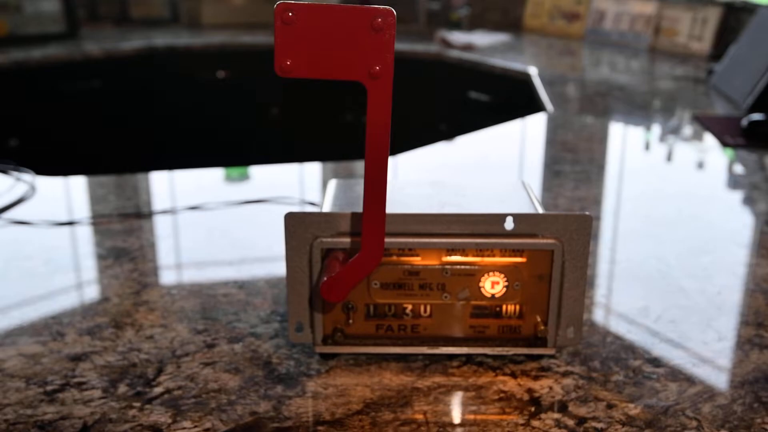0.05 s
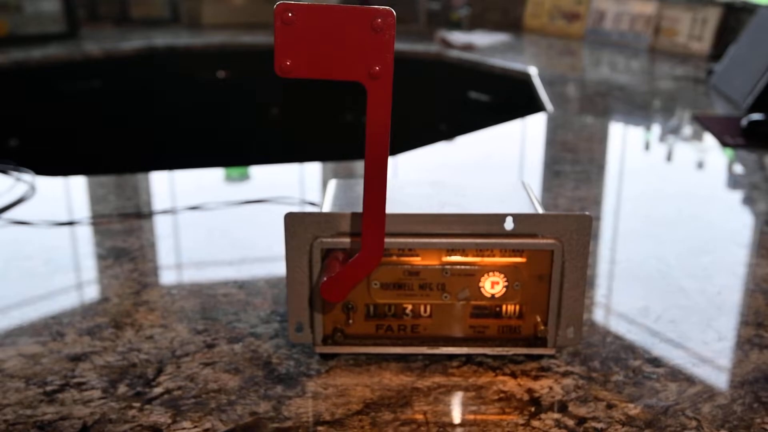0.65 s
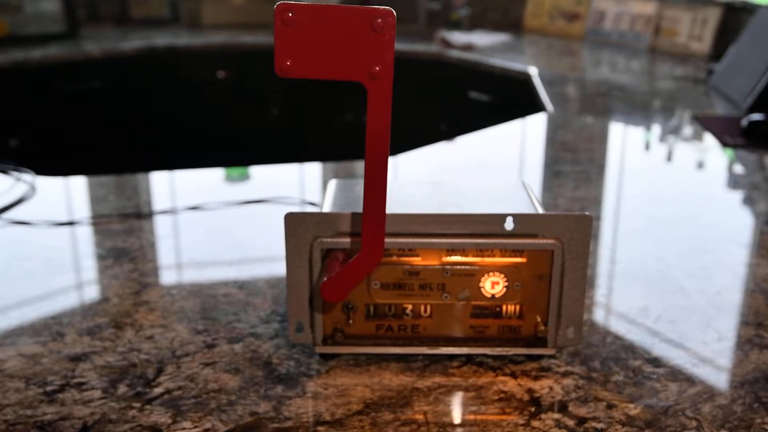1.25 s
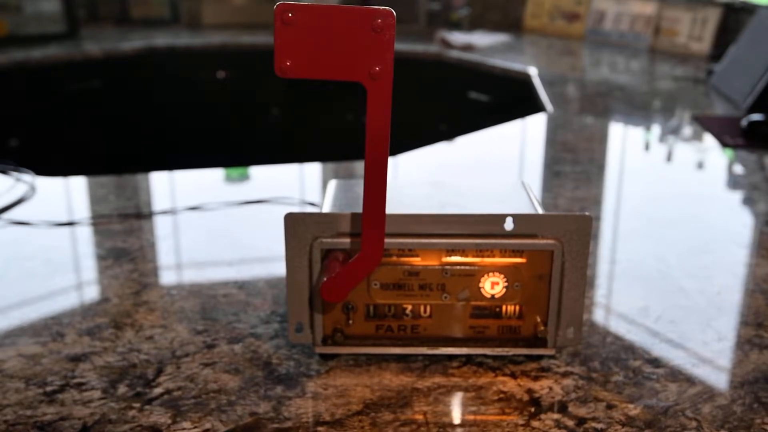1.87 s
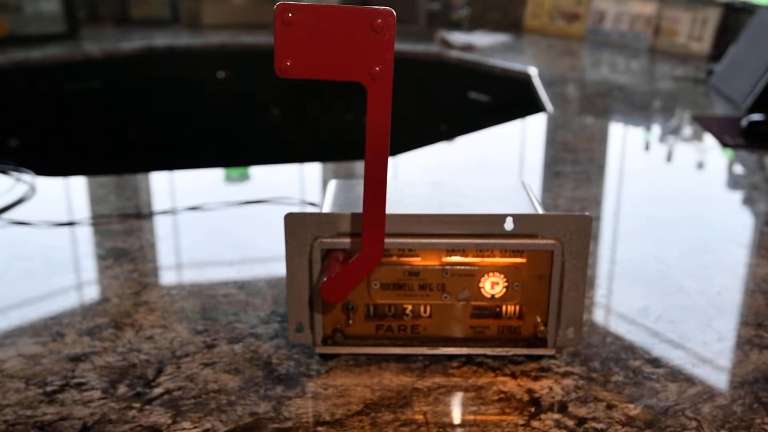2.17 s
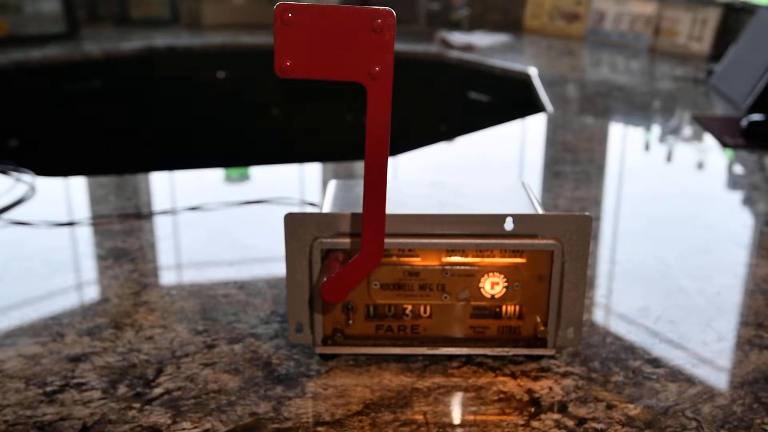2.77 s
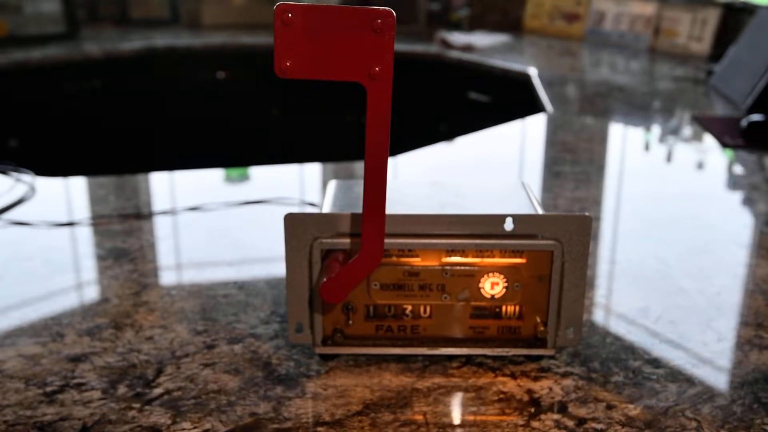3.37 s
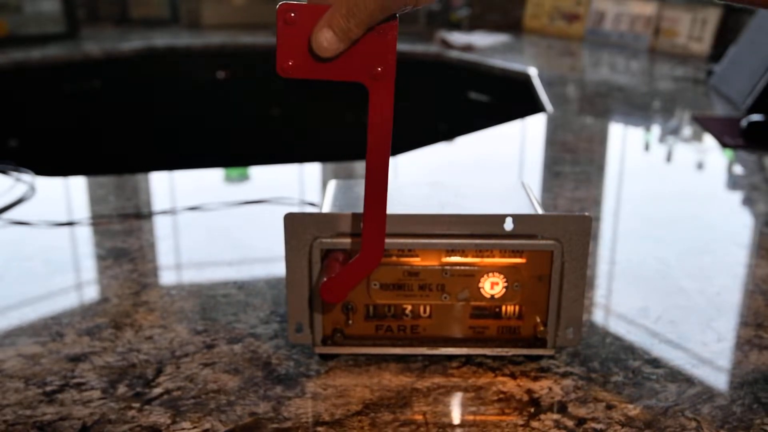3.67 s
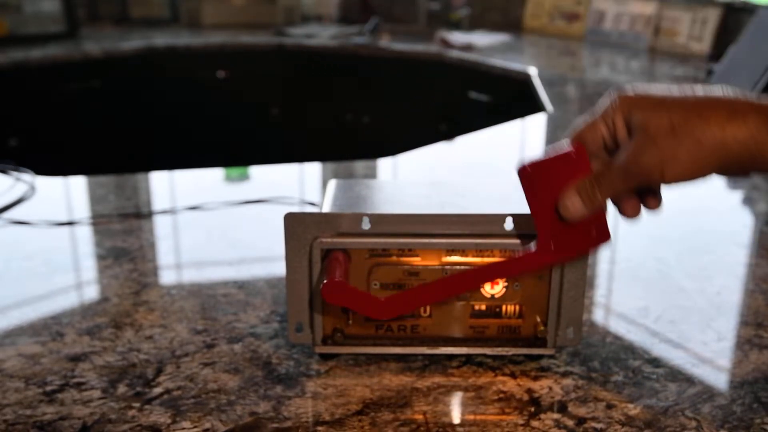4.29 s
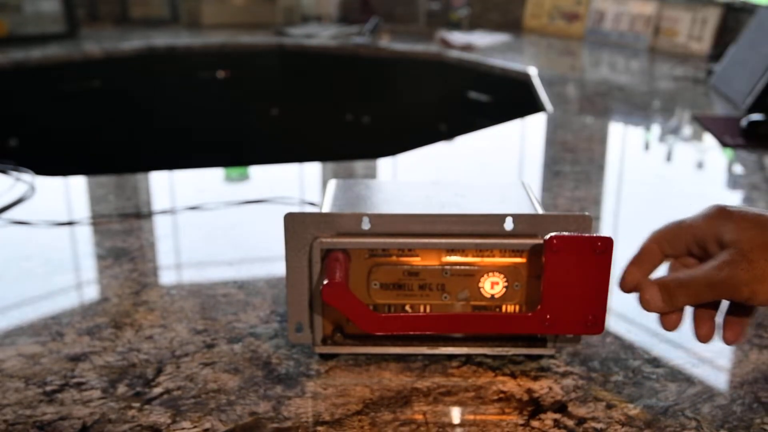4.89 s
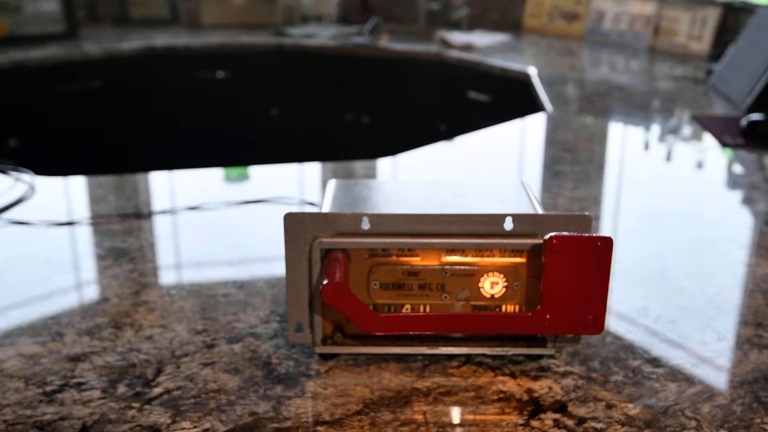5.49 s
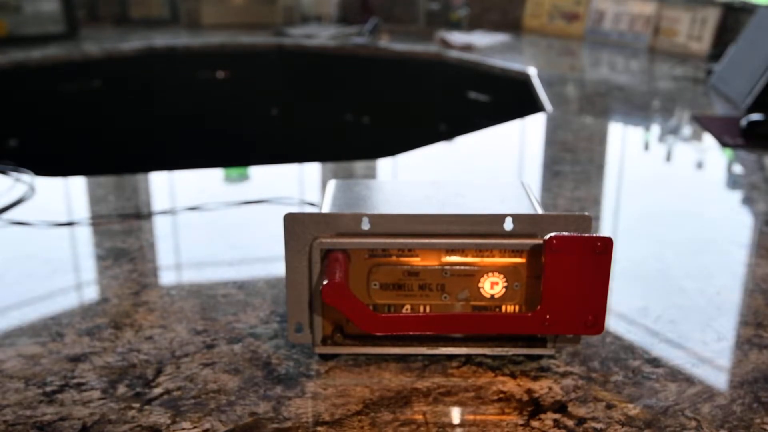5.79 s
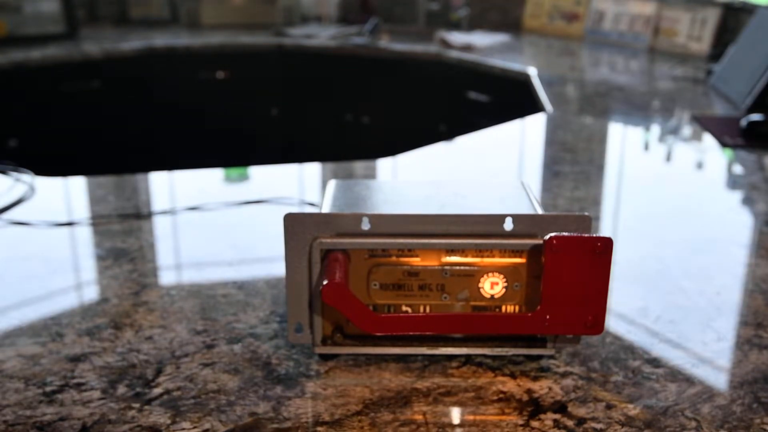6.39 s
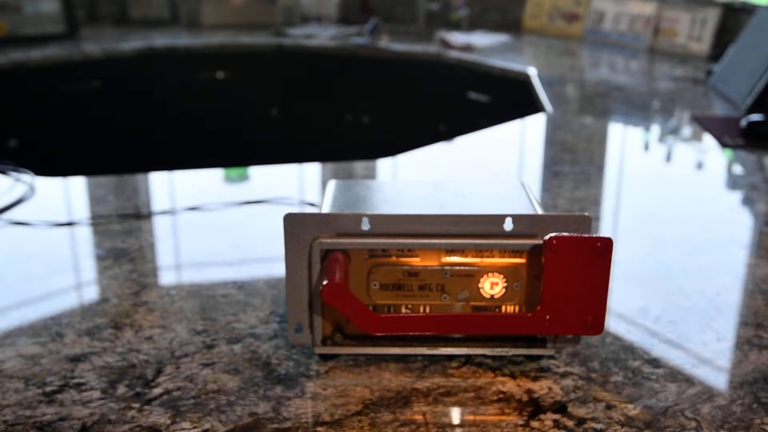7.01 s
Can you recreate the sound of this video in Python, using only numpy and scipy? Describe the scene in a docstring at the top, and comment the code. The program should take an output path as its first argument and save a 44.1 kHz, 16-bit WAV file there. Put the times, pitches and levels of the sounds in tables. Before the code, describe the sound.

Close up in a quiet kitchen, the gears of a mechanical fare meter run with a steady whirr. After faint clothing rustle and soft thumps, its lever is pulled down, clicking unevenly and rocking the metal case. Three loud, snapping clunks follow, a little under a second apart, as the number drums advance. Each leaves a brief metallic ring, while the gears keep turning softly over a faint hum.

```python
"""Mechanical taxi meter in a kitchen.

The gear train whirrs on a stone counter. Someone steps up, clothes rustling, and turns the flag lever
down through its detents, loading the gears. The fare drums advance three times: a pawl drops, a catch
lets go, a spring slams the drum home and rings the steel case. The gears run on, quieter."""
import sys
import numpy as np
from scipy import signal
from scipy.fft import rfft, irfft, next_fast_len
from scipy.io import wavfile

SR = 44100
rng = np.random.default_rng(int(sys.argv[2]) if len(sys.argv) > 2 else 0)


def transcribe(signal):
    """Save signal, clipped to [-1, 1], as a 16-bit WAV file at the path in sys.argv[1]."""
    frames = np.atleast_2d(signal).T
    limited = np.clip(frames, -1, 1)
    pcm = np.round(limited * 32767).astype(np.int16)
    wavfile.write(sys.argv[1], SR, pcm)


N = 310905
TIME = np.arange(N) / SR


def from_db(db):
    """Decibels to gain."""
    return 10 ** (np.asarray(db) / 20)


def unit_rms(x):
    """Scale to rms 1."""
    return x / np.sqrt(np.mean(x ** 2) + 1e-20)


def at_hz(table, hz):
    """Read a table on a log-frequency axis."""
    table_hz, values = np.transpose(table)
    return np.interp(np.log(np.maximum(hz, 1)), np.log(table_hz), values)


def drift(rate_hz):
    """Linear glide between unit-normal random values."""
    knots = rng.standard_normal(400)
    return np.interp(TIME * rate_hz, np.arange(len(knots)), knots)


def highpass(x, hz, order=2):
    """Butterworth high-pass."""
    return signal.sosfilt(signal.butter(order, hz, "high", fs=SR, output="sos"), x + 1e-18)


def add(out, time_s, sound):
    """Mix a sound in at time_s."""
    start = round(time_s * SR)
    out[..., start:start + sound.shape[-1]] += sound[..., :N - start]


# Left-right correlation: (frequency [Hz], correlation [0..1])
CORRELATION = [(300, 1), (500, 1), (1000, 0.92), (2000, 0.78), (4000, 0.096), (15000, 0.073)]

def spread(pair, hz):
    """Two independent signals to stereo, alike in the bass."""
    alike = at_hz(CORRELATION, hz)
    return np.sqrt(1 + alike) * pair[0] + np.sqrt(1 - alike) * pair[1] * np.array([[1], [-1]])


def coloured(pair, spectrum):
    """Shape a noise pair to a spectrum; stereo, rms 1."""
    size = next_fast_len(N)
    hz = np.fft.rfftfreq(size, 1 / SR)
    bins = spread(rfft(pair, size), hz) * from_db(at_hz(spectrum, hz))
    return unit_rms(irfft(bins, size)[:, :N])


# Room hum and electronic whine: (frequency [Hz], rms level [dB])
HUM_TONES = [(42.0, -60.5), (48.4, -54), (7795, -74.5), (15590, -68)]
# Room air: (frequency [Hz], density [dB])
AIR_SPECTRUM = [(25, -20), (45, -8), (75, -4.5), (130, -5), (300, -23.5), (1000, -13), (4000, -24.5),
                (10000, -31.5), (16000, -34)]

def room_tone(air_db):
    """Wavering hum and whine over steady air noise."""
    hum = sum(from_db(db + 1.6 * drift(3.6)) * np.sin(2 * np.pi * (hz * TIME + rng.random()))
              for hz, db in HUM_TONES)
    return np.sqrt(2) * hum + from_db(air_db) * coloured(rng.standard_normal((2, N)), AIR_SPECTRUM)


# Gear noise, free-running and loaded: (frequency [Hz], density [dB])
FREE_SPECTRUM = [(100, -11), (180, -1.5), (320, -3.5), (420, -5.5), (680, -10.5), (880, -8), (1150, -5),
                 (1400, -16), (1680, -16), (1900, -3.5), (2200, -14), (2900, -17.5), (3700, -33.5),
                 (7000, -33)]
LOADED_SPECTRUM = [(100, 4), (170, 3.5), (280, 5.5), (420, -3.5), (750, -8.5), (1080, -2.5), (1350, -31),
                   (1650, -7), (1850, 2), (2150, -41), (2800, -15), (3270, -3), (3800, -57), (7000, -29)]
# Shaft harmonics sung by the case: (multiple of turn rate, level [dB])
SHAFT_HARMONICS = [(8, -15), (9, -22.5), (12, -19), (15, -8.5), (18, -15), (21, -8.5), (23, -14.5),
                   (39, -17), (50, -17), (54, -19), (57, -17), (63, -16), (70, -15), (118, -15.5),
                   (125, -31)]

def gear_train(turn_hz, wobble, repeat_share, wear_db, lobe_db, shaft_db):
    """Rough teeth recur every turn, pressed harder three times a turn; the lever adds load."""
    turns = np.cumsum(turn_hz * (1 + wobble * drift(3))) / SR
    size = round(SR / turn_hz)
    one_turn = unit_rms(irfft(np.exp(2j * np.pi * rng.random((2, size // 2 + 1))), size))
    teeth = one_turn[:, (turns * size).astype(int) % size]
    wear = unit_rms(sum(np.cos(2 * np.pi * (k * turns + rng.random())) for k in range(4, 11)))
    lobes = np.cos(2 * np.pi * 3 * turns)
    rub = np.sqrt(repeat_share) * teeth + np.sqrt(1 - repeat_share) * rng.standard_normal((2, N))
    rub *= from_db(lobe_db * lobes + wear_db * wear)
    shaft = sum(from_db(db + 2 * drift(10)) * np.sin(2 * np.pi * (k * turns + rng.random()))
                for k, db in SHAFT_HARMONICS)
    free = coloured(rub, FREE_SPECTRUM) + from_db(shaft_db) * shaft
    engage_s = (4.35, 4.65)
    free_db = np.interp(TIME, engage_s, (-46, -59))
    loaded_db = np.interp(TIME, engage_s, (-63, -48.5))
    return from_db(free_db) * free + from_db(loaded_db) * coloured(rub, LOADED_SPECTRUM)


def force_db(blow, hz):
    """Spectrum of a blow: hard contacts crack, heavy ones thud."""
    _, crack, thud, clank, sizzle = blow
    return at_hz([(380, thud), (1000, clank), (3000, crack), (7000, crack), (12000, sizzle)], hz)


# Dense case modes: (frequency [Hz], density [dB])
CLATTER_SPECTRUM = [(60, 4), (165, -6), (240, 11), (430, 2.5), (720, -4), (1080, 0.5), (1450, -13),
                    (1900, -4.5), (2450, -15), (3200, -12), (7000, -20), (11500, -13.5), (15000, -7.5),
                    (16500, -13)]
# Decay of case and kitchen: (frequency [Hz], t60 [s])
ROOM_DECAY = [(100, 0.92), (300, 0.49), (1000, 0.67), (3500, 0.6), (7000, 0.56), (15000, 0.3)]

def clatter(blows, level_db, crack_t60_s, rattle_db, rattle_t60_s, room_db):
    """Crowded modes as noise bands: a crack, a rattle of loose parts, the kitchen's tail."""
    out, t = np.zeros((2, N)), TIME[:SR // 2]
    edges_hz = np.geomspace(60, 17000, 29)
    white = rng.standard_normal((2, 2, SR + SR // 2))
    offsets = rng.integers(SR // 8, SR, len(blows))
    crack = from_db(-60 * t / crack_t60_s)
    rattle = from_db(rattle_db - 60 * t / rattle_t60_s)
    for k, (low, high) in enumerate(zip(edges_hz, edges_hz[1:])):
        hz = np.sqrt(low * high)
        bandpass = signal.butter(2, [low, high], "band", fs=SR, output="sos")
        band = spread(signal.sosfilt(bandpass, white[k % 2]), hz)
        tail = from_db(room_db - 60 * t / at_hz(ROOM_DECAY, hz))
        swell = 1 - np.exp(-t * hz / 1.5)   # builds over 1.5 cycles
        envelope = swell * np.sqrt(crack ** 2 + rattle ** 2 + tail ** 2)
        for blow, i in zip(blows, offsets):
            gain = from_db(force_db(blow, hz) + at_hz(CLATTER_SPECTRUM, hz))
            add(out, blow[0], gain * envelope * band[:, i:i + len(t)])
    return from_db(level_db) * out


# Faint clicks: (time [s], crack [dB], thud [dB], clank [dB], sizzle [dB])
FAINT_CLICKS = [(0.260, -40.5, -70, -49, -51), (2.130, -60, -41, -42, -64), (4.363, -42, -36, -42, -52),
                (5.721, -48, -48, -51, -54)]

def faint_clicks(slips):
    """A faint, sharp click as the sound fades in; later, soft ticks and the slips of the catch."""
    return clatter(FAINT_CLICKS + slips, level_db=21.5, crack_t60_s=0.033,
                   rattle_db=-25, rattle_t60_s=0.07, room_db=-18)


# Body movements: (peak time [s], length [s], level [dB])
MOVEMENTS = [(1.475, 0.15, -43.5), (2.09, .05, -54), (2.338, 0.024, -49), (2.83, 0.61, -45.5),
             (3.24, 0.2, -45)]
# Cloth friction: (frequency [Hz], density [dB])
CLOTH_SPECTRUM = [(500, -3), (2000, 0.5), (5000, -1.5), (10000, -1.5), (16000, -1)]

def clothes(grain_db, rise_db_per_s, sag_db_per_s, fall_db_per_s):
    """Sliding fibres hiss; each movement starts fast, slows and stops."""
    level_db = -np.inf
    for peak_s, length_s, db in MOVEMENTS:
        rise_db = rise_db_per_s * np.maximum(peak_s - TIME, 0)
        sag_db = sag_db_per_s * np.clip(TIME - peak_s, 0, length_s)
        fall_db = fall_db_per_s * np.maximum(TIME - peak_s - length_s, 0)
        level_db = np.maximum(level_db, db - rise_db - sag_db - fall_db)
    envelope = from_db(level_db + grain_db * drift(50))
    return envelope * coloured(rng.standard_normal((2, N)), CLOTH_SPECTRUM)


# Steps, then the meter rocking under the lever: (time [s], level [dB], frequency [Hz], t60 [s])
DULL_KNOCKS = [(2.325, -29, 75.6, 0.15), (2.392, -36, 102, 0.29), (4.187, -32.5, 294, 0.21),
               (4.238, -30, 241, 0.15), (4.376, -18, 327, 0.15), (4.397, -12, 303, 0.057),
               (4.434, -25, 331, .1), (4.656, -33, 258, 0.18)]
# Hollow bump against the counter: (frequency [Hz], level [dB], t60 [s])
BUMP_MODES = [(124, -24.5, 0.11), (195, -28.5, 0.08), (402.7, -28.5, .2), (429, -20.5, 0.093)]

def knocks(level_db, swell_cycles, bump_s):
    """Soft contacts ring low modes; a case panel answers each knock."""
    out, t = np.zeros(N), TIME[:SR // 2]

    def mode(hz, db, t60_s):
        """One softly struck mode."""
        swell = 1 - np.exp(-(t * hz / swell_cycles) ** 2)
        return from_db(level_db + db - 60 * t / t60_s) * swell * np.sin(2 * np.pi * hz * t)

    for time_s, db, hz, t60_s in DULL_KNOCKS:
        panel = mode(hz=1050, db=db - 14.5, t60_s=0.062)
        add(out, time_s, mode(hz, db, t60_s) + panel)
    add(out, bump_s, sum(mode(*row) for row in BUMP_MODES))
    return out


def struck(blows, modes, level_db, scatter_db):
    """Each blow rings all modes at scattered levels; high modes differ in phase left to right."""
    out, t = np.zeros((2, N)), TIME[:SR // 2]
    for hz, mode_db, t60_s in modes:
        phase = np.arccos(at_hz(CORRELATION, hz)) / 2 * rng.choice([-1, 1]) * np.array([[1], [-1]])
        envelope = from_db(level_db + mode_db - 60 * t / t60_s)
        tone = rng.choice([-1, 1]) * envelope * np.sin(2 * np.pi * hz * t + phase)
        for blow in blows:
            add(out, blow[0], tone * from_db(force_db(blow, hz) + scatter_db * rng.standard_normal()))
    return out


# Steel case: (frequency [Hz], level [dB], t60 [s])
CASE_MODES = [(55.7, -33, 1.0), (127.2, -7, 0.46), (224.2, -0.5, 0.35), (268.2, 4.5, 0.42),
              (333.6, -7, 0.66), (369.6, 3, 0.4), (474, 3, 0.053), (594, -6.5, 0.093), (774, -12, 0.21),
              (870, -9.5, 0.1), (955, 0.5, 0.18), (980.4, -12.5, 0.85), (1043, 6.5, 0.091),
              (1220, -36, 0.18), (1582, -21, 1), (1802, -2, 0.071), (1913, -11.5, 0.29)]

def case_ring(blows, level_db, scatter_db):
    """Blows in the mechanism ring the case's distinct low modes."""
    return struck(blows, CASE_MODES, level_db, scatter_db)


def snaps(blows, level_db, bounce_s):
    """Steel on steel: four hard micro-bounces, tending weaker."""
    clicks = np.zeros((2, N))
    for blow in blows:
        gaps_s = bounce_s * rng.uniform(0.45, 0.94, size=4)
        for k, time_s in enumerate(blow[0] + np.cumsum(gaps_s) - gaps_s[0]):
            bounce_db = level_db + force_db(blow, 14000) + 2 * (rng.standard_normal((2, 1)) - k)
            add(clicks, time_s, rng.choice([-1, 1]) * from_db(bounce_db))
    return highpass(clicks, 8000)


def pings(blows, centres_hz, level_db, t60_s, detune):
    """Each click flicks a small spring with a cluster of close modes."""
    out, t = np.zeros((2, N)), TIME[:SR // 8]
    for (time_s, *_, sizzle_db), hz in zip(blows, centres_hz):
        modes_hz = hz * (1 + detune * rng.standard_normal((24, 1)))
        cluster = np.sin(2 * np.pi * (modes_hz * t + rng.random((2, 24, 1)))).mean(axis=1)
        add(out, time_s, cluster * from_db(level_db + 0.5 * sizzle_db - 60 * t / t60_s))
    return out


# Detent and latch clicks: (time [s], level [dB], weight [dB], brightness [dB], ping [Hz])
LEVER_CLICKS = [(3.7649, -42.5, -9, -6.5, 6600), (3.919, -20.5, -4, -2, 7260),
                (4.0843, -40.5, -11, -8, 11900), (4.1191, -53.5, 14.5, 12, 14700),
                (4.1841, -41.5, -7, -3, 8000), (4.235, -24, 3.5, -3, 8100), (4.3727, -21.5, 5, 1, 14400),
                (4.6456, -39, 8, 0, 15000), (4.8527, -42, -11.5, 9.5, 10200)]
# Lever arm and detent spring: (frequency [Hz], level [dB], t60 [s])
ARM_MODES = [(1556, -17, 0.47), (1825, -2, 0.067), (2264, -3, 0.049), (2747, -10.5, 0.2), (3100, -16, 0.18),
             (3400, -18, 0.22), (4250, -19, .26), (6600, -19, 0.18), (7260, -33, 0.18), (8516, -28, 0.16),
             (13400, -16, .1)]

def flag_lever():
    """The lever clicks through its detents, ringing its arm and the case."""
    blows = []
    for time_s, db, weight_db, bright_db, _ in LEVER_CLICKS:
        thud_db = db - 4.5 + weight_db
        clank_db = db - 4 - 0.92 * bright_db
        sizzle_db = db - 10.5 + bright_db
        blows.append((time_s, db, thud_db, clank_db, sizzle_db))
    out = clatter(blows, level_db=16.5, crack_t60_s=0.042,
                  rattle_db=-8.5, rattle_t60_s=0.24, room_db=-15)
    out += case_ring(blows, level_db=-9.5, scatter_db=6)
    out += struck(blows, ARM_MODES, level_db=-2, scatter_db=1.5)
    out = highpass(out, 127)   # the light lever drives little bass
    out += snaps(blows, level_db=22.5, bounce_s=0.00071)
    pings_hz = [hz for *_, hz in LEVER_CLICKS]
    return out + pings(blows, pings_hz, level_db=-3, t60_s=0.09, detune=0.047)


def ring(hz, level_db, t60_s):
    """Free decay of one mode."""
    return from_db(level_db - 60 * TIME / t60_s) * np.sin(2 * np.pi * hz * TIME)


# Fare advances: (pawl drop [s], catch release [s], drum slam [s], catch hardness [dB])
FARE_ADVANCES = [(4.94, 5.0180, 5.0474, -1), (5.7974, 5.9000, 5.9258, 1.5), (6.6226, 6.8022, 6.8247, 5.5)]
# Pawls and drums: (frequency [Hz], level [dB], t60 [s])
WORKS_MODES = [(2740, -16, 0.36), (2900, -22, 0.16), (3300, -28, 0.093), (3230, -25, 0.27),
               (3760, -20.5, 0.23), (4800, -19, 0.33), (4940, -19, 0.21), (5050, -10, 0.075),
               (6130, -20, 0.34), (6500, -19, 0.16), (9500, -17, 0.22), (12200, -26, .2), (14200, -18, .17),
               (14600, -1, 0.15), (15200, 0, 0.14), (15700, -12, .09)]

def fare_drums():
    """Pawl, catch and slam ring the case; only the slam is hard enough to ring the works."""
    blows, slams = [], []
    for pawl_s, catch_s, slam_s, hard_db in FARE_ADVANCES:
        # (time [s], crack [dB], thud [dB], clank [dB], sizzle [dB])
        pawl = (pawl_s, -30, -35.5, -39, -35)
        catch = (catch_s, -25 + hard_db, -29, -22 + hard_db, -37 + hard_db)
        slam = (slam_s, -12.5, -20.5, -23, -20)
        blows += [pawl, catch, slam]
        slams.append(slam)
    out = clatter(blows, level_db=17, crack_t60_s=0.041, rattle_db=-9.5, rattle_t60_s=0.24, room_db=-13)
    out += case_ring(blows, level_db=-4.5, scatter_db=1)
    out += struck(slams, WORKS_MODES, level_db=-1, scatter_db=1)
    return out + snaps(blows, level_db=17.5, bounce_s=0.0012)


def catch_slips(lead_s):
    """Blows of the catch slipping just before it gives way."""
    return [(catch_s - lead_s, -61, -38, -39, -60) for _, catch_s, _, _ in FARE_ADVANCES]


def catch_ring():
    """The catch rings briefly on release."""
    out = np.zeros(N)
    for _, catch_s, _, hard_db in FARE_ADVANCES:
        add(out, catch_s, ring(hz=1115, level_db=-15.5 + hard_db, t60_s=0.042))
    return out


def drone(hz, level_db, rise_s, hold_s, fall_db_per_s):
    """A low tone swells after each slam, holds and fades."""
    envelope = 0
    for _, _, slam_s, _ in FARE_ADVANCES:
        age_s = TIME - slam_s
        attack = np.clip(age_s / rise_s, 0, 1)
        fall_db = fall_db_per_s * np.maximum(age_s - rise_s - hold_s, 0)
        envelope = np.maximum(envelope, attack * from_db(level_db - fall_db))
    cycles = np.cumsum(hz + 1.6 * drift(27.44)) / SR
    return np.sqrt(2) * envelope * np.sin(2 * np.pi * cycles)


def spring_ring():
    """The second and third slams leave a steel spring singing."""
    out = np.zeros(N)
    for _, _, slam_s, _ in FARE_ADVANCES[1:]:
        add(out, slam_s, ring(hz=1038, level_db=-41.5, t60_s=4))
    return out


def scene():
    """Meter, person and kitchen, in stereo."""
    out = flag_lever() + fare_drums() + catch_ring() + spring_ring()
    out += faint_clicks(catch_slips(lead_s=0.0033))
    out += knocks(level_db=4.5, swell_cycles=1.23, bump_s=2.78)
    out += gear_train(turn_hz=15.58, wobble=0.0025, repeat_share=0.36,
                      wear_db=1, lobe_db=1.7, shaft_db=5.5)
    out += clothes(grain_db=1.16, rise_db_per_s=127, sag_db_per_s=25, fall_db_per_s=97)
    out += drone(hz=103.2, level_db=-47, rise_s=0.15, hold_s=0.18, fall_db_per_s=31)
    return out + room_tone(air_db=-51.5)


def record(dry):
    """Fade in, fast then slower, bass lagging; cut rumble and the top."""
    knee_s, knee_db, final_db, bass_lag = 0.097, -22, -3.5, 0.47
    slope_db_per_s = np.where(TIME < knee_s, 792, 62)
    gain_db = np.minimum(knee_db + (TIME - knee_s) * slope_db_per_s, final_db)
    treble = highpass(dry, 500, order=1)
    bass = from_db(bass_lag * gain_db) * (dry - treble)
    faded = from_db(gain_db) * (treble + bass)
    lowpass = signal.ellip(12, 0.3, 70, 16100, fs=SR, output="sos")
    return signal.sosfilt(lowpass, highpass(faded, 30, order=4))


dry = scene()
out = record(dry)
transcribe(out)
```